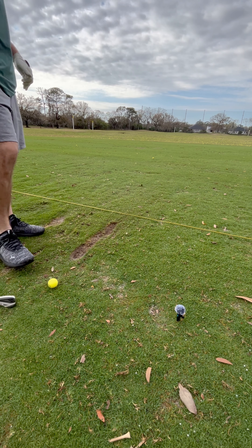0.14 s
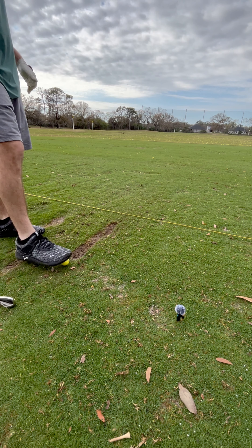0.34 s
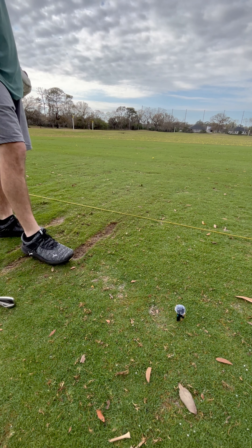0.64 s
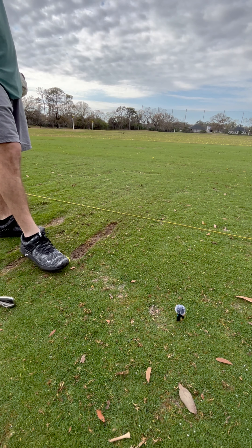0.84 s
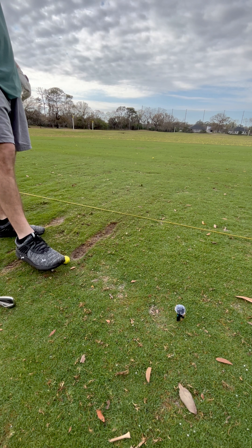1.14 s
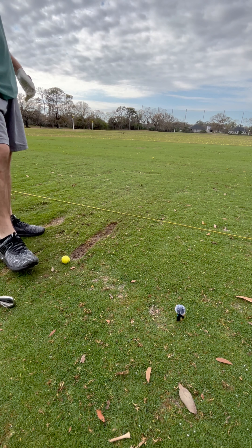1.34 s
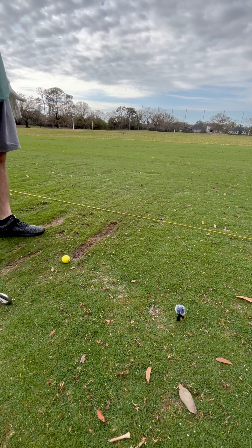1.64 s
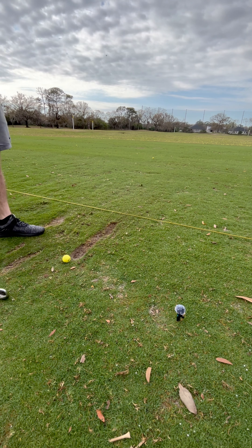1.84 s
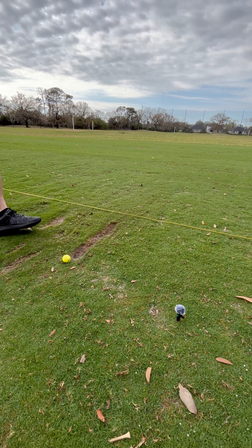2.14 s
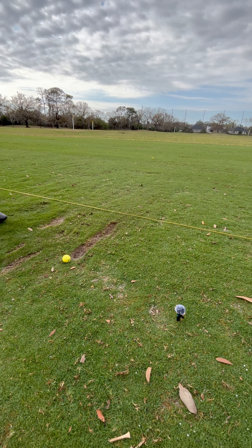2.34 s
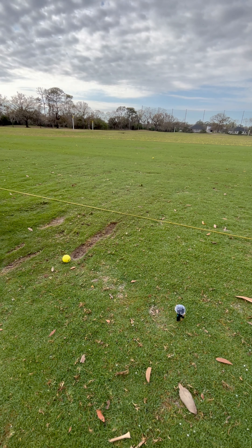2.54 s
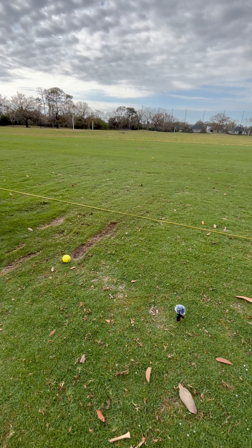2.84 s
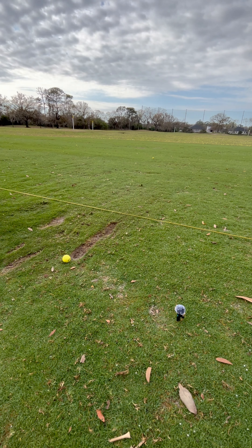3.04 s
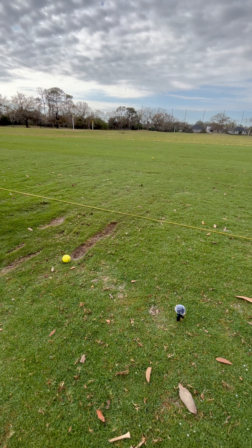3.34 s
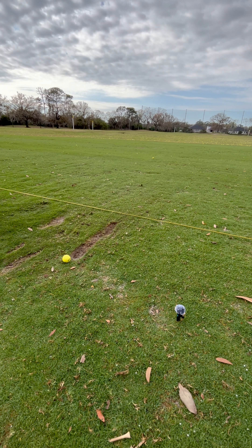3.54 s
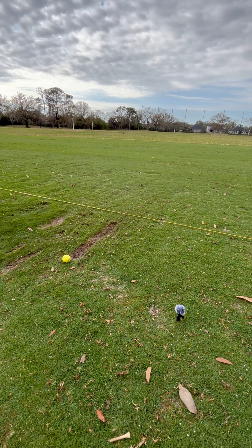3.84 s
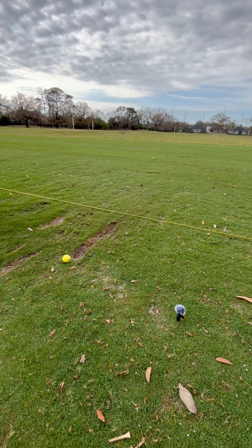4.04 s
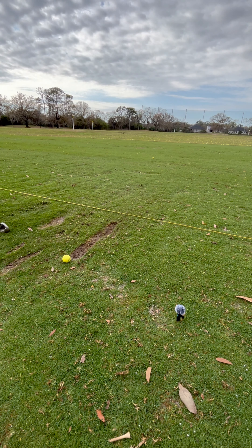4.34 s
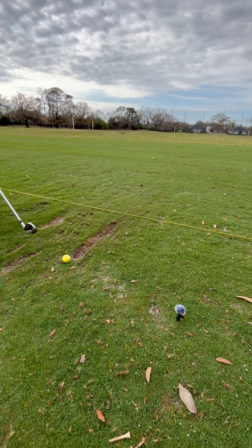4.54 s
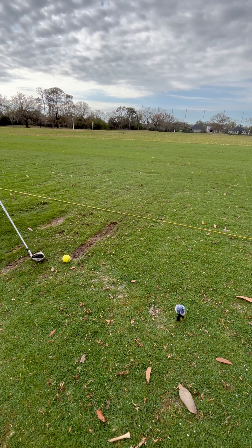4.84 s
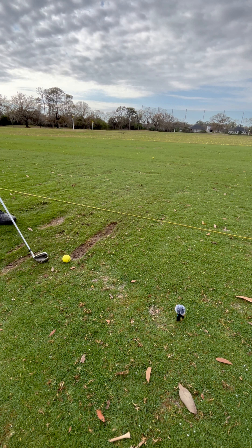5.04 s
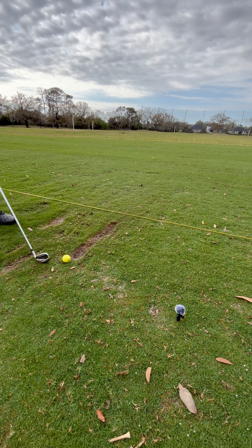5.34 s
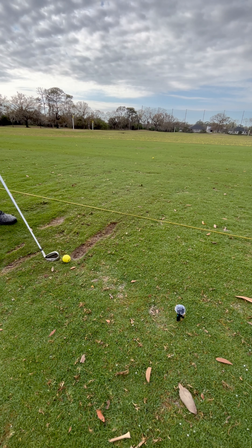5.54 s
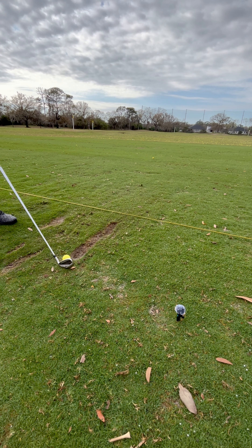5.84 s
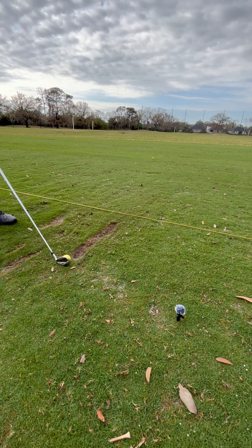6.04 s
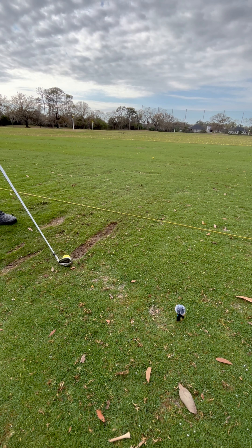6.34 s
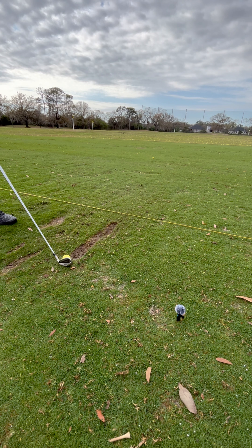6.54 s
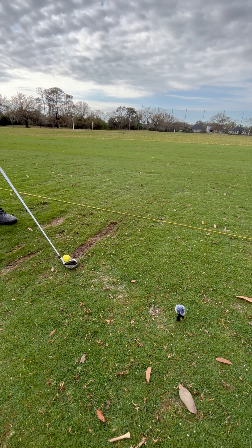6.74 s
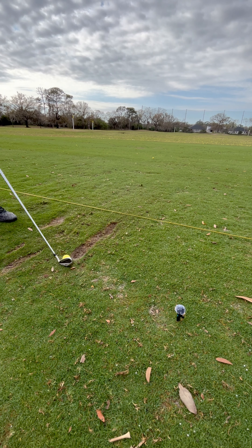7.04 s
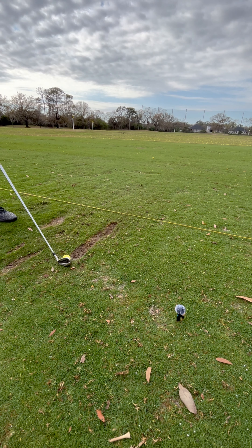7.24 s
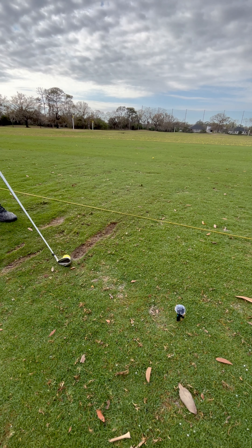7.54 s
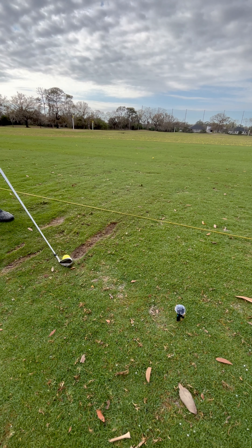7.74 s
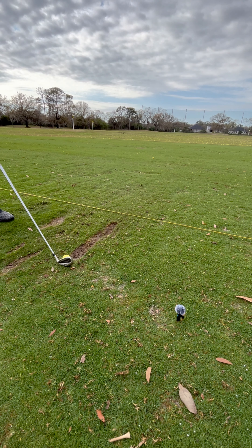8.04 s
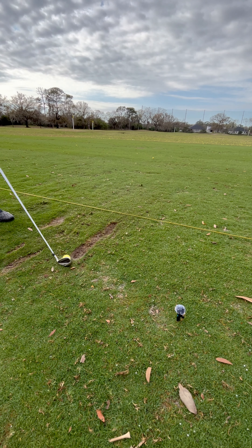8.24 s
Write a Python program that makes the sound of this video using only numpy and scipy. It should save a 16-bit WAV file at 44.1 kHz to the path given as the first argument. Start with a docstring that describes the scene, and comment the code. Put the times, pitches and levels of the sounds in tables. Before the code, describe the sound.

A golf iron swishes and cracks a ball off turf close by, then crows caw raspily over each other above low distant traffic.

```python
"""A golf practice field: just beside the phone an iron swishes, cracks on a ball and throws up turf.
The shot is shaped noise plus decaying club resonances. Crows caw over each other as raspy pulse trains
through throat and beak resonances; small birds add thin sine whistles and noise trills with a fast flutter.
Below lie filtered-noise traffic, light wind, far tones and soft bumps; the phone adds a faint steady whine."""
import sys
import numpy as np
from scipy import signal
from scipy.fft import rfft, irfft
from scipy.io import wavfile

SR = 44100
rng = np.random.default_rng(int(sys.argv[2]) if len(sys.argv) > 2 else 0)


def generate_wav(sig):
    """Save sig (samples, or channels by samples) to the path in sys.argv[1] as 16-bit PCM at SR."""
    pcm = np.round(np.clip(np.atleast_2d(sig).T, -1, 1) * 32767).astype(np.int16)
    wavfile.write(sys.argv[1], SR, pcm)


N = 369558
T = np.arange(N) / SR
STRIKE_S = 1.7373
RING_S = STRIKE_S + 0.0038  # end of the ring's build-up


def undb(db):
    """Decibels to gain."""
    return 10 ** (np.asarray(db) / 20)


def unit(x):
    """Scale to rms 1."""
    return x / np.sqrt(np.mean(x ** 2) + 1e-30)


def shape(x, points):
    """Filter by a spectrum of (frequency [Hz], gain [dB]) points, falling 22 dB/octave beyond its ends."""
    hz, db = np.transpose(points)
    octave = np.log2(np.maximum(np.fft.rfftfreq(N, 1 / SR), 1))
    beyond = np.abs(octave - np.clip(octave, np.log2(hz[0]), np.log2(hz[-1])))
    gain_db = np.interp(octave, np.log2(hz), db) - 22 * beyond
    return irfft(rfft(x) * undb(gain_db), N)


def colour(x, points):
    """Filter by a spectrum of points, then scale to rms 1."""
    return unit(shape(x, points))


def band(hz, width_hz):
    """Noise in one bell-shaped band; rms 1."""
    bell = np.exp(-2 * ((np.fft.rfftfreq(N, 1 / SR) - hz) / width_hz) ** 2)
    return unit(irfft(rfft(rng.standard_normal(N)) * bell, N))


def walk(rate_hz):
    """Smooth random wander, low-passed at about this rate; rms 1."""
    return band(0, rate_hz)


def ease(share):
    """A rounded step from 0 to 1."""
    return np.sin(np.pi / 2 * np.clip(share, 0, 1))


def swell(start_s, end_s):
    """A rounded rise and fall between two times."""
    return np.sin(np.pi * np.clip((T - start_s) / (end_s - start_s), 0, 1))


def burst(at_s, rise_s, t60_s):
    """Exponential growth up to a moment and decay after it, each given as the time for 60 dB."""
    return np.exp(-np.log(1000) * np.maximum((at_s - T) / rise_s, (T - at_s) / t60_s))


def field(x, wet_db, t60_s):
    """Add the diffuse echo scattered back by trees: convolution with a decaying noise tail."""
    t = T[:SR]
    onset = 1 - np.exp(-t / 0.021)
    tail = rng.standard_normal(SR) * np.exp(-np.log(1000) * t / t60_s) * onset
    tail /= np.sqrt(np.sum(tail ** 2))
    return x + undb(wet_db) * signal.fftconvolve(x, tail)[:N]


def shaft_swish():
    """Air noise in a low band grows as the shaft comes down and stops at contact."""
    return undb(-35.5) * band(460, 260) * burst(STRIKE_S, rise_s=0.1, t60_s=0.0063)


def club_and_ball():
    """A short knock of contact, then head and ball ring as a sum of decaying modes."""
    # club head and ball modes: (frequency [Hz], amplitude [dB], t60 [s])
    modes = [(478, -31, 0.078), (949, -33.5, 0.019), (1200, -41, 0.065), (1430, -32, 0.034),
             (1720, -27.5, 0.022), (1960, -31.5, .022), (2757, -39, 0.02), (3300, -49.5, .029),
             (3715, -38.5, .026), (3930, -31, 0.024), (4360, -43, .04), (4405, -30.5, .028),
             (6370, -36.5, 0.015), (6625, -34, 0.015), (6944, -42.5, .026), (8500, -33.5, 0.021),
             (8720, -29, 0.013), (9010, -39, 0.015)]
    since = T - STRIKE_S
    knock = undb(-19.5) * np.sin(2 * np.pi * 1400 * since) * np.exp(-(since / .0009) ** 2)
    # the ring builds up while the face drives through ball and ground
    near = np.flatnonzero(np.abs(T - RING_S) < .3)
    t = T[near] - RING_S
    build = np.clip(1 + t / .0052, 0, 1) ** 1.1
    ring = np.zeros(N)
    for hz, db, t60_s in modes:
        lag_s = rng.uniform(-.0003, .0003)
        decay = np.exp(-np.log(1000) * np.maximum(t, 0) / t60_s)
        ring[near] += undb(db) * build * decay * np.cos(2 * np.pi * hz * (since[near] - lag_s))
    return knock + ring


def divot():
    """The sole slaps the turf, the ground shudders, grass tears and soil flies as grainy noise."""
    # crack spectrum: (frequency [Hz], relative gain [dB])
    crack_spectrum = [(300, -1), (2000, 8), (5000, -13), (7000, 0), (9000, -8.5), (11000, -15.5),
                      (15000, -36)]
    # flying soil spectrum: (frequency [Hz], relative gain [dB])
    soil_spectrum = [(1500, -40.5), (2300, -16), (2900, -3), (4200, 9.5), (5200, -8), (6800, -2.5),
                     (8700, -18), (11000, -22.5), (15000, -31)]
    grass_spectrum = [(2500, -9.5), (4200, -0.5), (5400, -8.0), (7000, 1.5),
                      (8700, -1.5), (11000, -8.0), (15000, -19.5)]
    since = T - STRIKE_S
    slap = undb(-34.5) * np.cos(2 * np.pi * 375 * since) * np.exp(-(since / 0.0019) ** 2)
    ground = undb(-43.5) * band(414, 170) + undb(-45.5) * band(230, 110)
    thud = ground * burst(RING_S, rise_s=0.018, t60_s=.19)
    crack_noise = colour(rng.standard_normal(N), crack_spectrum)
    crack = undb(-34.5) * crack_noise * burst(RING_S, rise_s=.017, t60_s=0.039)
    # grass rips as the head comes out of the ground
    rip = undb(-52.0) * burst(1.7595, rise_s=0.028, t60_s=0.037)
    rip += undb(-65) * burst(1.745, rise_s=.01, t60_s=0.31)
    grass = colour(rng.standard_normal(N), grass_spectrum) * rip
    # sparse grains of uneven strength
    grains = rng.standard_normal(N) * undb(1.7 * rng.exponential(size=N)) * (rng.random(N) < .15)
    soil_noise = colour(np.clip(grains, -12, 12), soil_spectrum)
    soil = undb(-54.5) * soil_noise * burst(1.836, rise_s=0.079, t60_s=0.15)
    return slap + thud + crack + grass + soil


def golf_shot():
    """Swish, contact and divot, with a weak echo."""
    return field(shaft_swish() + club_and_ball() + divot(), wet_db=-33.5, t60_s=0.363)


def beak_gain(partial_hz, closed, tilt_db, drift, apart):
    """Gain of the upper resonances, which climb and brighten as the beak opens."""
    # resonances, beak wide open: (centre [Hz], width [Hz], relative level [dB])
    resonances = [(4436, 500, 1.5), (5464, 910, -0.5), (6850, 1070, 1.5), (8670, 550, -17.5)]
    shut_tilt_db, shut_drop_share = -6, 0.065
    lowest_hz = resonances[0][0]
    gain = 0
    for k, (centre_hz, width_hz, peak_db) in enumerate(resonances):
        moving_hz = centre_hz * (1 - shut_drop_share * closed ** 2 + 0.021 * drift[apart[k]])
        tilt = (tilt_db + shut_tilt_db * closed) * (centre_hz / lowest_hz - 1) * 1.6
        level_db = peak_db + tilt + 1.5 * drift[apart[-k - 1]]
        gain = gain + undb(level_db) / (1 + ((partial_hz - moving_hz) / width_hz) ** 2 * 2) ** 2
    return gain


def crows():
    """Each caw is a pulse train on an arching pitch; rasp shakes its period and strength and adds pulsed air."""
    # caws: (start [s], length [s], crest pitch [Hz], fall [share of crest pitch], rasp [0-1],
    # throat centre [Hz], level before throat filter [dB], level of upper resonances before
    # beak closing and edge filter [dB], their tilt [dB per 2.77 kHz])
    caws = [(0.256, 0.181, 318, 0.093, 0.73, 1580, -77, -84.0, 3),
            (0.506, 0.26, 337, 0.12, 0.62, 1630, -79.5, -88, 2),
            (1.074, 0.16, 349, 0.23, 0.46, 1230, -58, -85.0, -4),
            (1.509, 0.22, 355.6, 0.26, 0.47, 1630, -57.5, -67, -3),
            (1.752, 0.15, 345, 0.079, 0.5, 1240, -49.5, -71, 2),
            (1.849, 0.19, 371, 0.25, 0.43, 1610, -56.0, -66.0, -0.5),
            (2.112, 0.14, 308.4, 0.35, 0.15, 1520, -44, -78, -2),
            (2.194, 0.24, 255.4, 0.031, 0.44, 1580, -47.5, -67, 0),
            (2.539, 0.24, 354, 0.14, 0.68, 1590, -51, -63, 2.5),
            (2.91, 0.23, 355, 0.12, 0.73, 1490, -55, -65.5, 2),
            (3.107, 0.14, 308.7, 0.29, 0.1, 1580, -44.5, -70.5, -21),
            (3.199, 0.24, 253.8, 0.15, 0.33, 1590, -48.5, -69.5, -9),
            (3.321, 0.18, 357, 0.24, 0.45, 1550, -56.5, -68.5, -3.5),
            (3.587, 0.27, 329.4, 0.27, 0.61, 1720, -56, -77, 2.5),
            (3.671, 0.24, 352, 0.16, 0.52, 1470, -55.5, -63.5, -4),
            (3.905, 0.23, 339.4, 0.23, 0.6, 1510, -59.0, -85.0, 4),
            (4.178, 0.22, 340.4, 0.17, 0.53, 1630, -54.5, -81, -4),
            (4.255, 0.25, 339.7, 0.23, 0.48, 1500, -56, -72, -4),
            (4.667, 0.23, 335.7, 0.2, 0.75, 1670, -52.5, -69.5, 6),
            (4.727, 0.23, 347, 0.22, 0.6, 1490, -60, -66, 6),
            (5.072, 0.23, 331.4, 0.16, 0.5, 1395, -64.5, -87.0, 5),
            (5.267, 0.178, 326, 0.18, 0.38, 1560, -53.0, -74, -10),
            (5.312, 0.2, 336, 0.25, 0.49, 1490, -54, -67.5, -6),
            (5.494, 0.19, 341.7, 0.23, 0.29, 1500, -55.5, -88, 2),
            (5.739, 0.232, 325, 0.16, 0.49, 1450, -55, -81.5, 11),
            (5.857, 0.23, 350, 0.27, 0.4, 1563, -53.5, -63.5, 0.5),
            (6.288, 0.23, 326.6, 0.18, 0.53, 1550, -51.5, -77.0, -4),
            (6.415, 0.22, 349, 0.27, 0.47, 1560, -55.5, -66.5, -7),
            (6.735, 0.2, 366, 0.3, 0.52, 1425, -43.5, -69.5, -18),
            (6.825, 0.2, 321.4, 0.26, 0.37, 1530, -53.5, -73.5, -6),
            (7.082, 0.24, 334, 0.28, 0.43, 1600, -56.5, -69.5, -13),
            (7.187, 0.21, 363, 0.29, 0.77, 1440, -46, -75, -11),
            (7.256, 0.2, 359, 0.31, 0.34, 1340, -59, -76.5, -11),
            (7.371, 0.21, 321.5, 0.21, 0.45, 1530, -58, -75, 3),
            (7.674, 0.25, 346.7, 0.32, 0.55, 1720, -61.5, -71, -11),
            (7.925, 0.23, 320.5, 0.27, 0.42, 1470, -57.5, -66, 2),
            (8.301, 0.19, 328, 0.1, 0.66, 1564, -63, -79, -3)]
    # main throat resonance: (frequency [Hz], gain [dB])
    throat_spectrum = [(700, -37.5), (1000, -19.5), (1250, -2.5), (1450, 3), (1600, 0), (1800, -3.5),
                       (2000, -13), (2250, -32.5), (2700, -52)]
    # band in which the upper resonances radiate: (frequency [Hz], gain [dB])
    edge_spectrum = [(3300, -19), (4100, 2), (9000, -8)]
    # pitch crests early; the tabled fall is reached at fall_reach of the way from crest to end
    crest_share, fall_reach, fall_curve = .29, .9, 1.7
    attack_s, rasp_attack_s, release_s = .04, 0.13, 0.087  # raspy caws start more slowly
    beak_lateness, shut_db = 1.12, -4
    jitter, flutter, hiss, waver = .033, 0.67, 0.96, 0.0076  # shares; all but waver scale with rasp
    focus_hz, scatter_rad, fading_db, unsteady_db = 230, 1.55, 3.0, 1.0

    shake, tremor, air, drift = walk(190), band(95, 210), rng.standard_normal(N), walk(16)
    voice, upper = np.zeros(N), np.zeros(N)
    harmonics = np.arange(2, 36)[:, None]
    for start_s, length_s, top_hz, fall, rasp, throat_hz, db, upper_db, tilt_db in caws:
        i = np.flatnonzero((T > start_s) & (T < start_s + length_s))
        t = T[i] - start_s
        # random places in the shared noises: one per caw, one per harmonic
        own = (i + rng.integers(N)) % N
        apart = (i + rng.integers(N, size=harmonics.shape)) % N

        from_crest = np.abs(t / length_s - crest_share) / (fall_reach * (1 - crest_share))
        arch = np.minimum(from_crest, 1.2) ** fall_curve
        hz = top_hz * (1 - fall * arch) * (1 + waver * drift[own])
        phase = 2 * np.pi * np.cumsum(hz * (1 + jitter * rasp * shake[own])) / SR

        # on the way through the branches each harmonic fades and lags on its own
        lag_rad = scatter_rad * drift[apart[:, :1]] + .5 * drift[apart]
        partials = np.cos(harmonics * phase + lag_rad) * undb(fading_db * drift[apart[::-1]])

        attack = ease(t / (attack_s + rasp_attack_s * rasp))
        envelope = attack * ease((length_s - t) / release_s) ** 2
        roughness = (1 + flutter * rasp * tremor[own]) / np.hypot(1, flutter * rasp)
        strength = envelope * undb(unsteady_db * drift[own]) * roughness
        puffs = air[own] * (1 + 1.3 * np.cos(phase))

        # the throat favours the harmonic nearest its centre
        focus = 1 / (1 + ((harmonics * hz - throat_hz) / focus_hz) ** 2) ** 0.89
        tone = unit((focus * partials).sum(axis=0))
        voice[i] += undb(db) * strength * (tone + 2 * hiss * rasp * puffs)

        # the beak opens and shuts once a caw
        closed = 1 - np.sin(np.pi * (t / length_s) ** beak_lateness)
        beak = beak_gain(harmonics * hz, closed, tilt_db, drift, apart)
        bright = unit((beak * partials).sum(axis=0))
        upper[i] += undb(upper_db + shut_db * closed) * strength * bright
    low = field(shape(voice, throat_spectrum), wet_db=-12.5, t60_s=0.26)
    return low + field(shape(upper, edge_spectrum), wet_db=-5.5, t60_s=0.12)


def whistles():
    """Quavering whistles that sag in pitch and sound mostly on their second harmonic."""
    # falling whistles: (start [s], length [s], second harmonic at start [Hz], same at end [Hz],
    # level [dB], overtone gain [dB])
    calls = [(1.38, 0.34, 2815, 2630, -79.5, -6), (3.08, 0.375, 2777, 2733, -73.5, 0),
             (7.37, .35, 3763, 3364, -51, -21)]
    out = np.zeros(N)
    for start_s, length_s, from_hz, to_hz, db, overtone_db in calls:
        hz = from_hz + (to_hz - from_hz) * np.clip((T - start_s) / length_s, 0, 1) ** 1.5
        wavering_hz = hz * (1 + 0.0073 * walk(150) + 0.0039 * walk(14))
        phase = np.pi * np.cumsum(wavering_hz) / SR  # fundamental, half the heard pitch
        overtones = sum(np.sin(k * phase) * walk(50) * undb(-7 * (k - 3)) for k in (3, 4, 5))
        quaver = undb(5.0 * walk(45))
        tone = np.sin(2 * phase) + undb(overtone_db) * overtones
        out += undb(db) * quaver * swell(start_s, start_s + length_s) ** .8 * tone
    return out


def trills():
    """Noise bands fluttering at 65 Hz, and a buzz that ends the last whistle."""
    # buzzy trills: (middle [s], length [s], centre [Hz], width [Hz], mean level [dB])
    calls = [(0.071, 0.81, 3270, 930, -79), (2.42, 0.88, 3320, 480, -84), (4.978, 0.84, 3470, 420, -77.5),
             (4.85, 0.54, 2500, 1200, -82)]
    # closing buzz: (frequency [Hz], relative gain [dB])
    buzz_spectrum = [(2900, -20.5), (3350, 4.5), (3800, -11), (4300, 2.5), (4900, -23), (6200, -16),
                     (6700, 0), (7200, -20)]
    flutter = 1 + 0.15 * np.sin(2 * np.pi * 65 * T)
    out = np.zeros(N)
    for middle_s, length_s, hz, width_hz, db in calls:
        level = undb(db + 2 * walk(14))
        envelope = swell(middle_s - length_s / 2, middle_s + length_s / 2)
        out += level * envelope * band(hz, width_hz) * flutter
    buzz = colour(rng.standard_normal(N), buzz_spectrum) * swell(7.66, 7.85) ** 2 * flutter
    return out + undb(-59.5) * buzz


def songbirds():
    """Whistles and trills of small birds, echoed by the trees."""
    return field(whistles() + trills(), wet_db=-10.5, t60_s=0.2)


def far_tones():
    """Faint far-off sine tones with an unsteady pitch."""
    # far tones: (start [s], end [s], frequency [Hz], level [dB])
    tones = [(2.326, 2.48, 501, -67), (3.483, 3.6, 488, -58), (7.793, 8.598, 668, -70.5)]
    out = np.zeros(N)
    for start_s, end_s, hz, db in tones:
        phase = 2 * np.pi * np.cumsum(hz * (1 + 0.0132 * walk(34.0))) / SR
        out += undb(db) * swell(start_s, end_s) * np.sin(phase)
    return out


def turf_bumps():
    """Soft bumps on the turf: short swells of band noise."""
    # bumps: (middle [s], centre [Hz], width [Hz], half length [s], level [dB])
    bumps = [(0.485, 557, 596, 0.0098, -63.5), (3.777, 72, 75, 0.041, -42), (4.928, 163, 164, 0.016, -46)]
    out = np.zeros(N)
    for at_s, hz, width_hz, half_s, db in bumps:
        out += undb(db) * band(hz, width_hz) * swell(at_s - half_s, at_s + half_s)
    return out


def traffic_and_wind():
    """Road noise whose bass is steady but for puffs of wind on the microphone, plus an engine drone."""
    # traffic spectrum: (frequency [Hz], relative gain [dB])
    road_spectrum = [(12, -24.5), (20, 1), (65, -3.5), (80, -4), (101, -12.5), (129, -8), (143, -19.5),
                     (160, -16), (218, -19.5), (400, -30), (495, -31), (612, -31), (664, -31), (808, -34),
                     (1000, -39.5), (1300, -61), (2200, -120)]
    # wind puffs: (middle [s], length [s], bass level [dB])
    gusts = [(.73, 0.44, -49.5), (3.27, 0.23, -42.5), (4.21, 0.15, -46.5), (5.249, .12, -42.5)]
    road_db, rumble_db = -50.5, -52  # road before its upper part is trimmed; rumble without gusts
    road = undb(road_db) * colour(rng.standard_normal(N), road_spectrum)
    bass = signal.sosfiltfilt(signal.butter(4, 110, fs=SR, output="sos"), road)
    wind_power = sum((undb(db) * swell(at_s - length_s / 2, at_s + length_s / 2)) ** 2
                     for at_s, length_s, db in gusts)
    rumble = unit(bass) * np.sqrt(undb(rumble_db) ** 2 + wind_power)
    upper_road = (road - bass) * undb(0.67 * walk(3.4) - 1.0)
    drone = undb(-64.5) * band(132, 20) + undb(-83.5) * band(485, 90)
    return rumble + upper_road + drone


def air_hiss():
    """Faint filtered noise with a slowly wandering level."""
    # air spectrum: (frequency [Hz], relative gain [dB])
    air_spectrum = [(600, -13.5), (900, 3.5), (1200, 3), (1600, -1.5), (2300, -9), (3200, -9), (5000, -11),
                    (6900, -10), (7600, -6.5), (8100, -7), (8400, -8.5), (11500, -9.5), (14000, -16),
                    (15500, -26)]
    return undb(-80) * colour(rng.standard_normal(N), air_spectrum) * undb(.5 * walk(4))


def background():
    """Far tones, bumps, traffic, wind and air hiss."""
    return far_tones() + turf_bumps() + traffic_and_wind() + air_hiss()


def scene():
    """Everything on the field, in one channel."""
    return (golf_shot() + crows() + songbirds() + background())[None]


def record(dry):
    """The phone adds its steady electronic whine and cuts the top with a steep low-pass."""
    # whine: (frequency [Hz], rms level [dB])
    whine_tones = [(4800, -98.5), (7200, -95.5), (7800, -96), (8000, -87), (9600, -94), (10400, -87.5),
                   (12000, -99)]
    top_hz = 15300
    whine = sum(np.sqrt(2) * undb(db) * np.sin(2 * np.pi * (hz * T + rng.random()))
                for hz, db in whine_tones)
    low_pass = signal.ellip(10, .1, 70, top_hz, fs=SR, output="sos")
    return signal.sosfilt(low_pass, dry + whine)


dry = scene()
out = record(dry)
generate_wav(out)
```